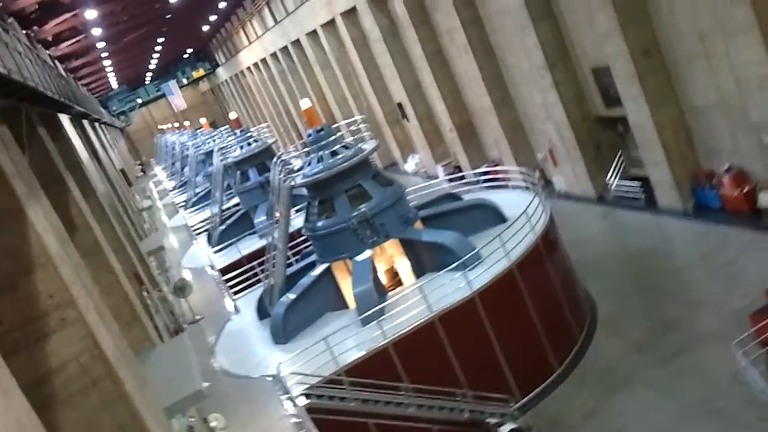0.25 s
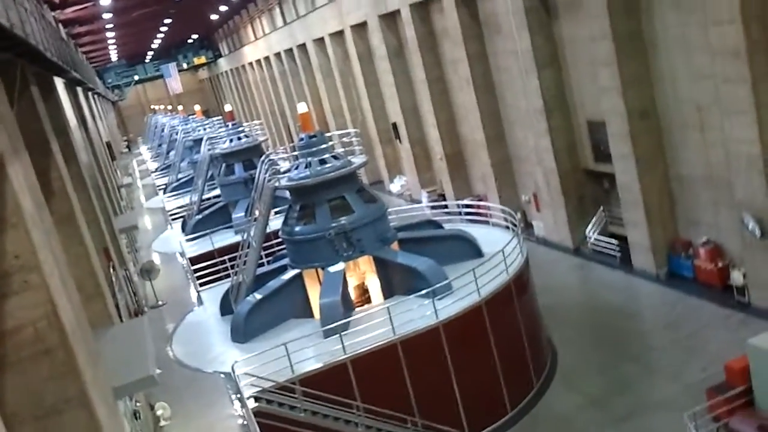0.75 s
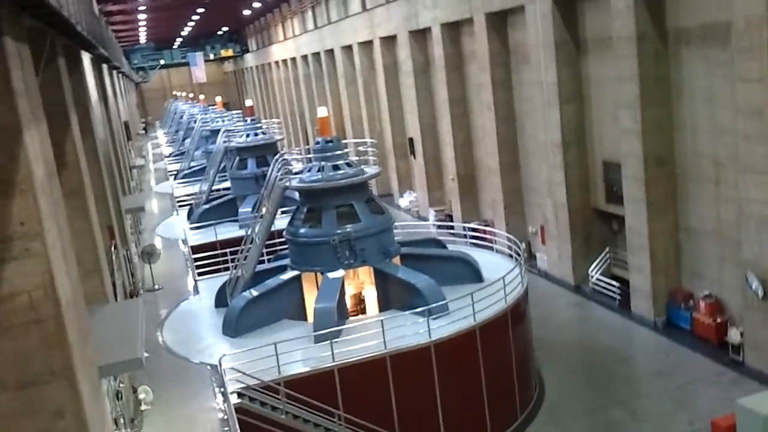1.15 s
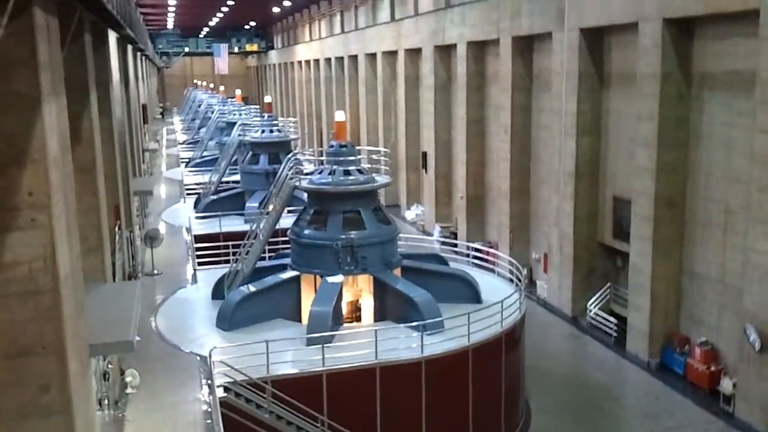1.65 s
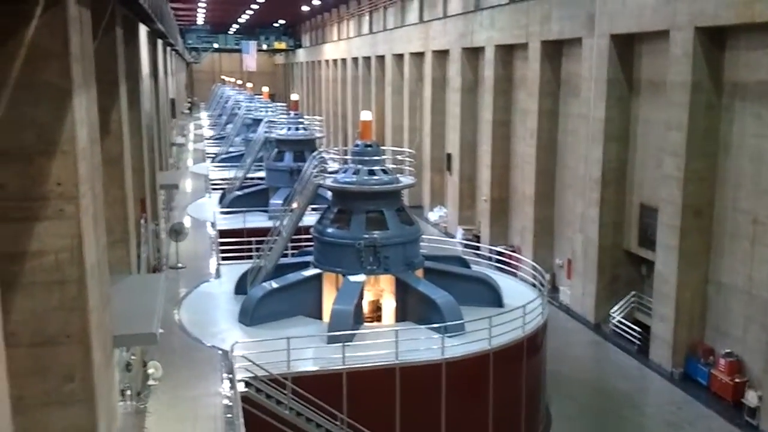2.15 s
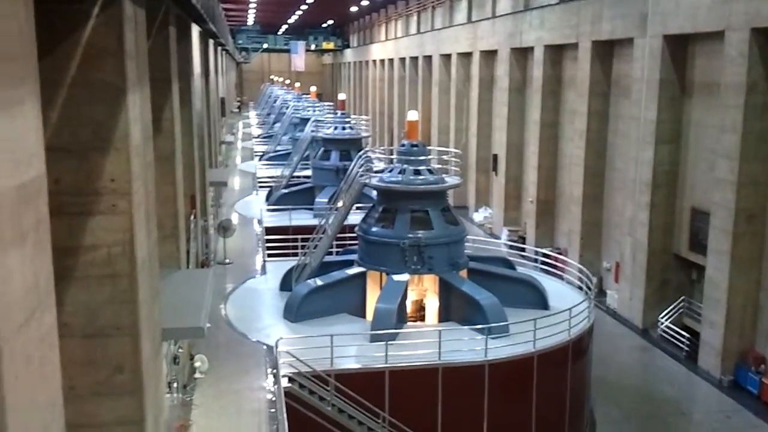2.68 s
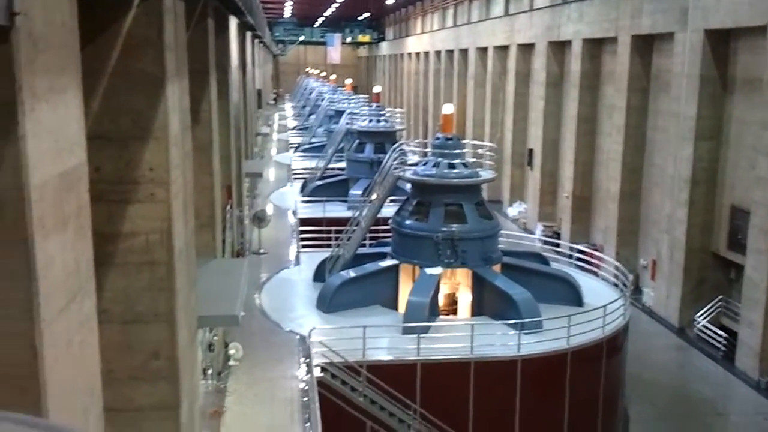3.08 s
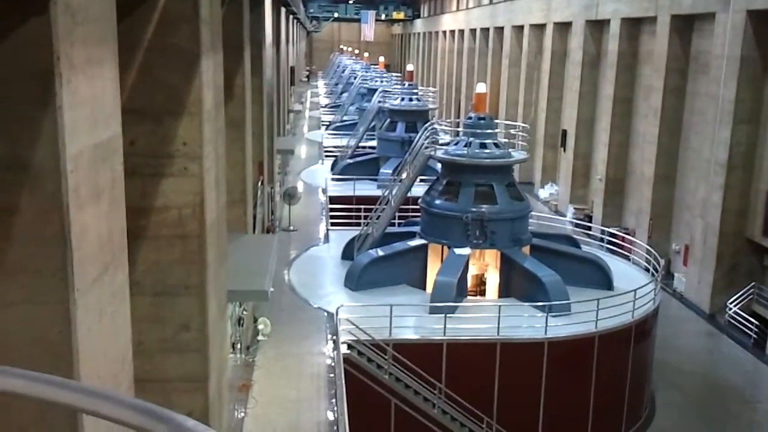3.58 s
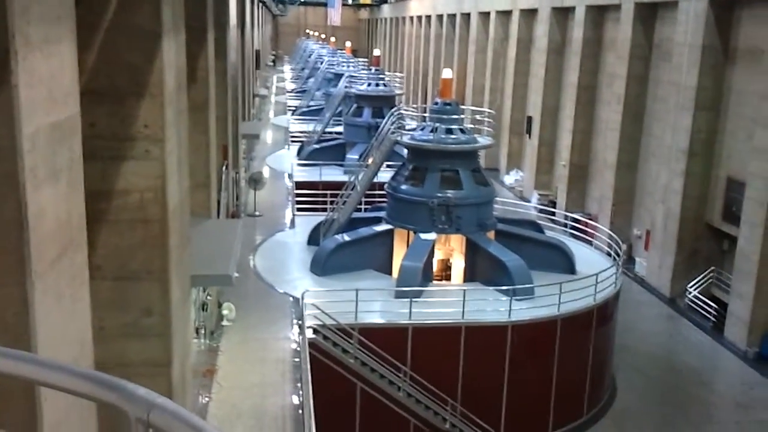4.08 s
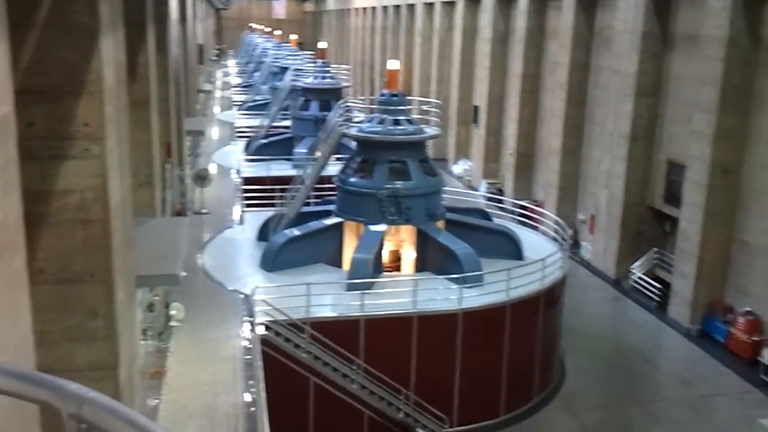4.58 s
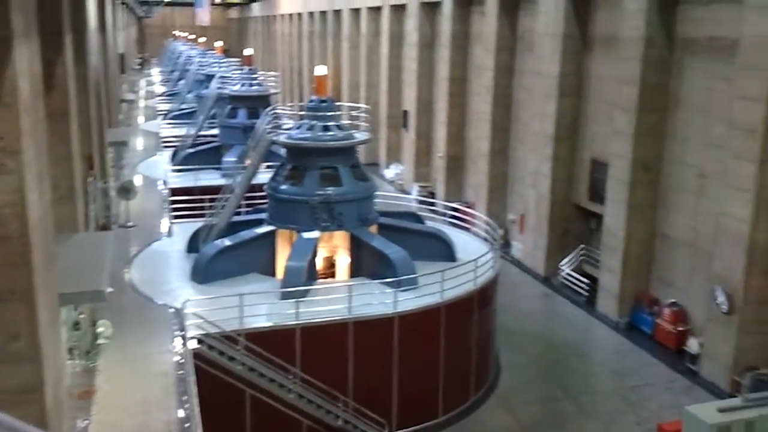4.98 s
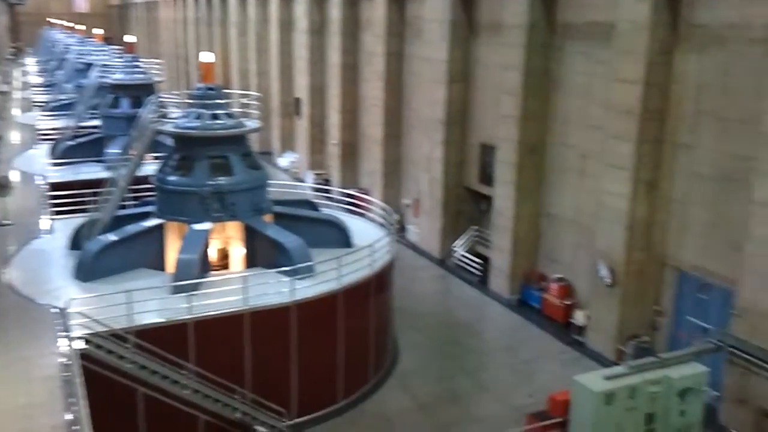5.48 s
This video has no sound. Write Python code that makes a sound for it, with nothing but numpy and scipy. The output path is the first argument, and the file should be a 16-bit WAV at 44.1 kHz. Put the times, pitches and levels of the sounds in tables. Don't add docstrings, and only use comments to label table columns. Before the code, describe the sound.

A loud, steady roar of large generators fills a long concrete hall, with a low electrical hum and constant machine tones, through an overloaded microphone.

```python
import sys
import numpy as np
from scipy import signal
from scipy.fft import rfft, irfft
from scipy.io import wavfile
from scipy.ndimage import uniform_filter1d

SR = 44100
rng = np.random.default_rng(int(sys.argv[2]) if len(sys.argv) > 2 else 0)


def gain_from_db(level_db):
    decades = np.asarray(level_db, float) / 20
    return 10 ** decades


def store_pcm(level_fs):
    pcm = np.round(np.clip(level_fs, -1, 1) * 32767).astype(np.int16)
    wavfile.write(sys.argv[1], SR, np.atleast_2d(pcm).T)


N = 253134
MAINS_HZ = 59.975


def unit(x):
    return (x - np.mean(x)) / np.std(x)


def drift(rate_hz):
    hz = np.fft.rfftfreq(N, 1 / SR)
    return unit(irfft(rfft(rng.standard_normal(N)) / (1 + (hz / rate_hz) ** 2), N))


def roar():
    # frequency in Hz,
    # level in dB per Hz.
    roar_spectrum = [(12, -0.5), (42, 2), (68, -0.5), (105, 3.5), (170, 1), (280, -2), (370, -0.5),
                     (580, -3.5),
                     (800, -9), (1550, -12.5), (1950, -17.5), (2350, -22), (3300, -25), (3750, -28.5),
                     (6200, -35.5)]
    roar_db, hiss_rise_db_per_s = -6.5, 0.08
    casing_hz, casing_octaves = 460, 0.6
    surge_db, surge_hz = 1, 6.0

    hz = np.fft.rfftfreq(N, 1 / SR) + 1e-3
    point_hz, point_db = np.transpose(roar_spectrum)
    spectrum_db = np.interp(np.log(hz), np.log(point_hz), point_db)
    air = rfft(rng.standard_normal(N)) * gain_from_db(spectrum_db)
    air = air * hz ** 2 / (hz ** 2 + 64)

    hiss_share = 1 / (1 + (1200 / hz) ** 4)
    from_middle_s = (np.arange(N) - N / 2) / SR
    hiss = irfft(air * hiss_share, N) * gain_from_db(hiss_rise_db_per_s * from_middle_s)

    rumble = air * (1 - hiss_share)
    casing_share = np.exp(-0.5 * (np.log2(hz / casing_hz) / casing_octaves) ** 2)
    casing = irfft(rumble * casing_share, N) * gain_from_db(surge_db * drift(surge_hz))
    steady = irfft(rumble * (1 - casing_share), N)
    return gain_from_db(roar_db) * unit(steady + casing + hiss)


def tones(base_hz, orders, levels_db, wander_db):
    crest_s = 0.156
    flutter_db_per_khz, flutter_hz = 4.0, 4.0
    t = np.arange(N) / SR - crest_s
    out = np.zeros(N)
    for order, level_db in zip(orders, levels_db):
        hz = base_hz * order
        wander = wander_db * drift(0.65)
        flutter = flutter_db_per_khz * hz / 1000 * drift(flutter_hz)
        out += np.sqrt(2) * gain_from_db(level_db + wander + flutter) * np.cos(2 * np.pi * hz * t)
    return out


def core_hum():
    core_orders = [1, 2, 4, 8, 10, 14, 20, 22, 28, 32]
    core_db = [-18, -10.5, -31.5, -29.5, -25, -31.5, -42.5, -46.5, -45, -41]
    return tones(MAINS_HZ, core_orders, core_db, wander_db=1.5)


def runner_blades():
    blade_orders = [47, 48]
    blade_db = [-20.5, -14]
    turns_per_s = MAINS_HZ / 20
    return tones(turns_per_s, blade_orders, blade_db, wander_db=-0.5)


def pump_motor():
    pump_orders = [1, 4, 5, 7, 14]
    pump_db = [-17.5, -32.5, -27.5, -28.5, -44.5]
    return tones(79.966, pump_orders, pump_db, wander_db=0.7)


def scene():
    return (roar() + core_hum() + runner_blades() + pump_motor())[None]


def overload(x):
    top, knee = 0.87, 9.8
    return x / (1 + np.abs(x / top) ** knee) ** (1 / knee)


def bass_cut(x):
    stage = signal.butter(1, 202, "high", fs=SR, output="sos")
    return signal.sosfilt(np.vstack([stage, stage]), x)


def narrow_band(x):
    # frequency in Hz, gain in dB.
    band_edge = [(6000, 0), (6600, -4.5), (7000, -9), (7300, -11.5), (7600, -19), (7900, -25.5),
                 (8050, -78.5)]
    frame_samples = 2822
    floor_db, floor_spread_db = -79, 2.7
    drop_under_db, drop_from_hz, rounding_db = -6.5, 2700, -0.5

    shape = dict(fs=SR, window="cosine", nperseg=2 * frame_samples, noverlap=frame_samples)
    hz, _, bins = signal.stft(x, **shape)
    bins = bins * gain_from_db(np.interp(hz, *np.transpose(band_edge)))[:, None]
    size = np.abs(bins)
    around = uniform_filter1d(size, size=24, axis=-2) * gain_from_db(drop_under_db)
    around = around * (hz > drop_from_hz)[:, None]
    frame_floor = gain_from_db(floor_db + floor_spread_db * rng.standard_normal(size.shape[-1]))
    kept = size > np.maximum(around, frame_floor)
    random_phase = np.exp(2j * np.pi * rng.random(size.shape))
    rounding = gain_from_db(rounding_db) * around * random_phase
    return signal.istft((bins + rounding) * kept, **shape)[1][..., :N]


def ticks():
    # time in seconds, peak in dB.
    tick_events = [
        (0.181, -53.5),
        (1.9525, -57),
        (2.1804, -70.5),
        (2.6035, -59),
        (3.1153, -62),
        (3.49, -54.5),
        (4.2018, -56.5),
        (5.1801, -65.5),
    ]
    gain_db = 17
    time_s, peak_db = np.transpose(tick_events)
    out = np.zeros(N)
    out[(time_s * SR).astype(int)] = gain_from_db(peak_db + gain_db)
    return out


def band_limit(x):
    return signal.sosfilt(signal.butter(12, 11000, fs=SR, output="sos"), x)


def record(dry):
    thin = bass_cut(overload(dry))
    narrow = narrow_band(np.clip(thin, -0.93, 0.93))
    stored = np.clip(narrow, -0.985, 0.985) + ticks()
    return band_limit(stored)


dry = scene()
out = record(dry)
store_pcm(out)
```